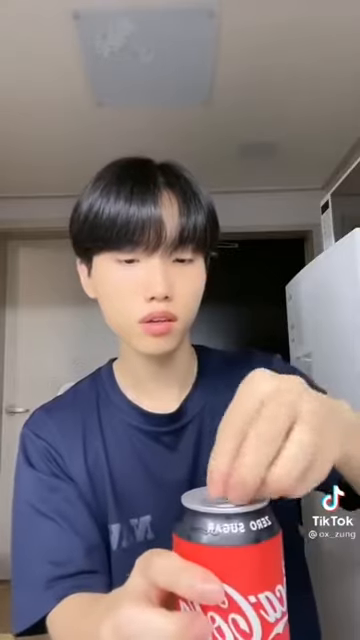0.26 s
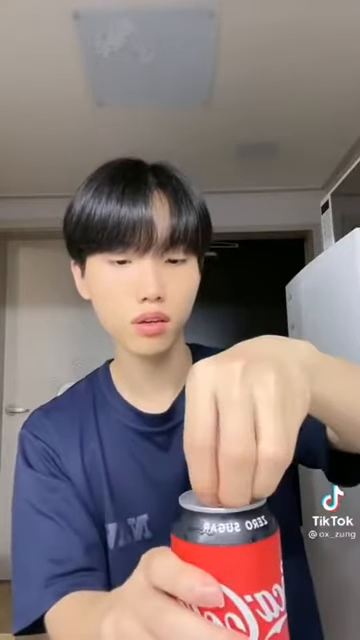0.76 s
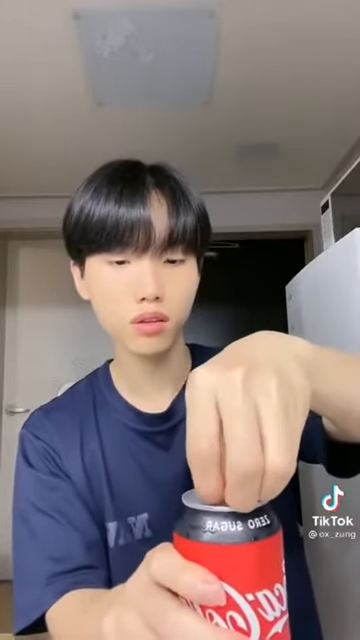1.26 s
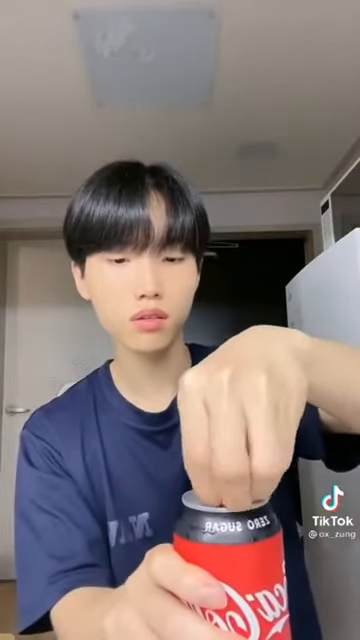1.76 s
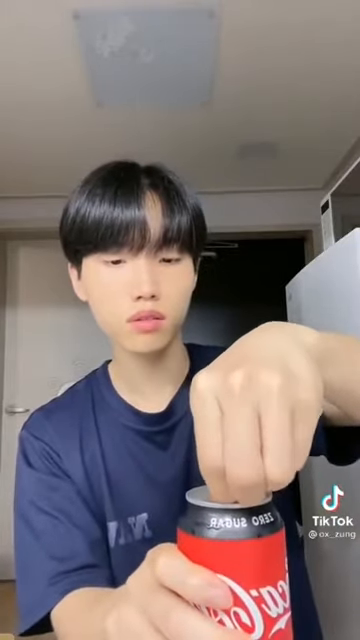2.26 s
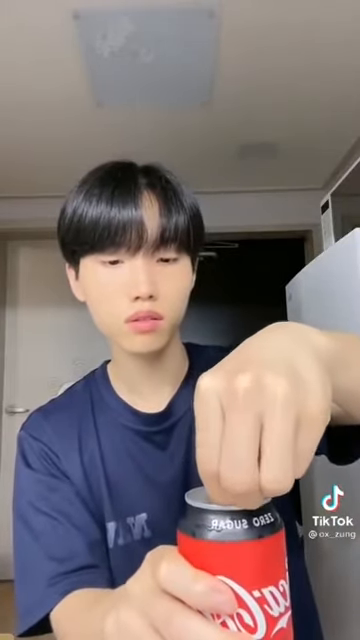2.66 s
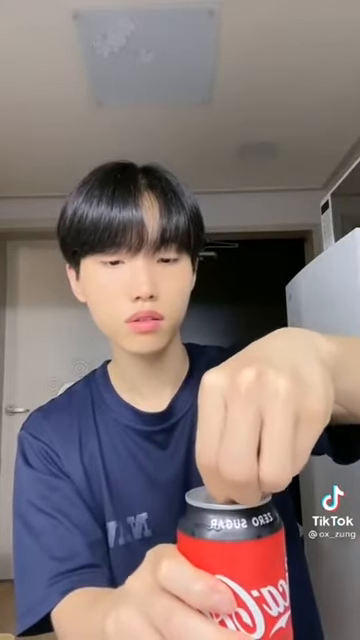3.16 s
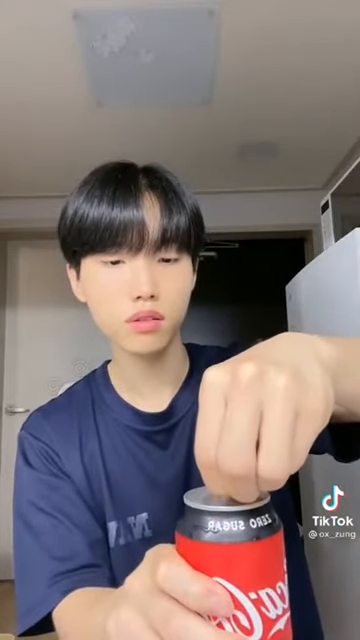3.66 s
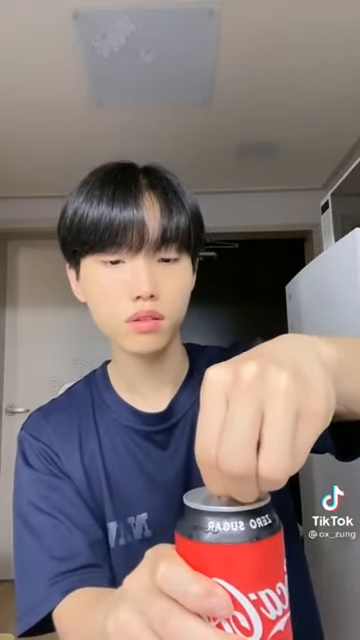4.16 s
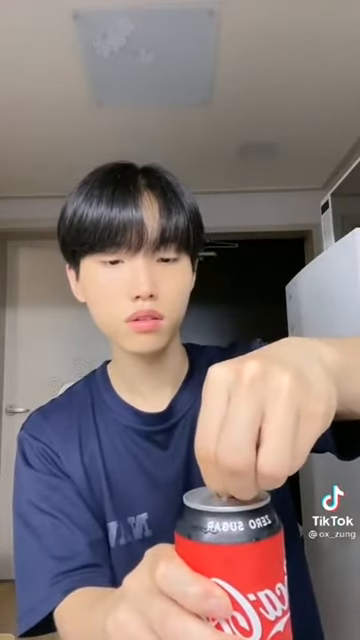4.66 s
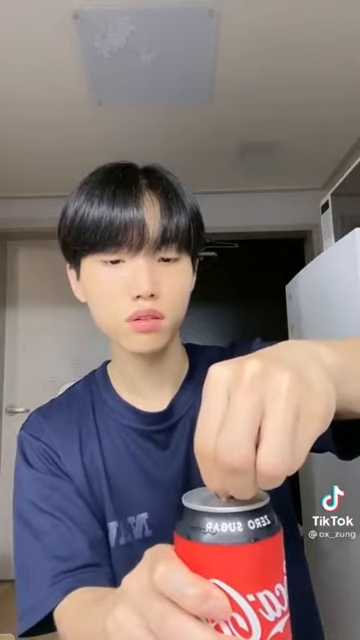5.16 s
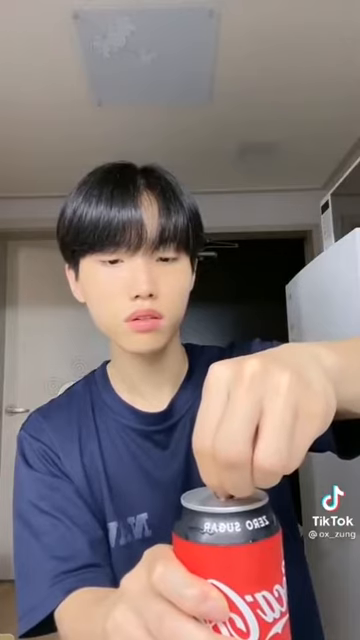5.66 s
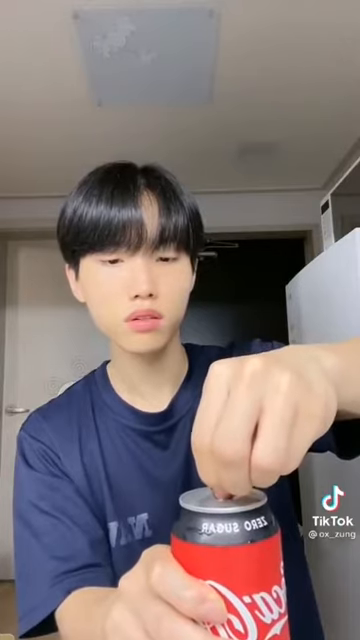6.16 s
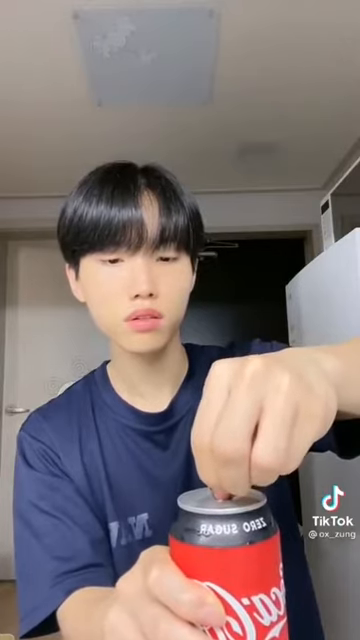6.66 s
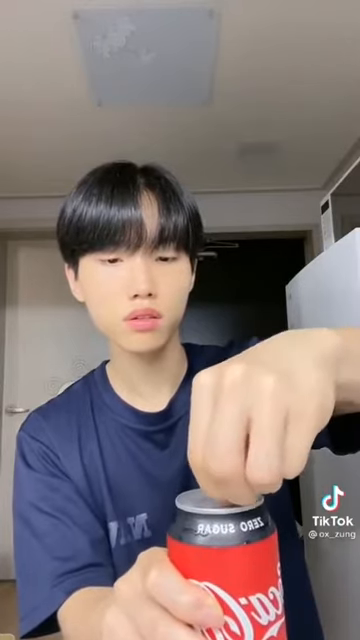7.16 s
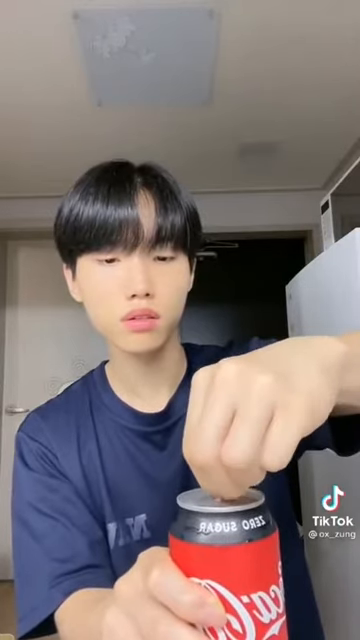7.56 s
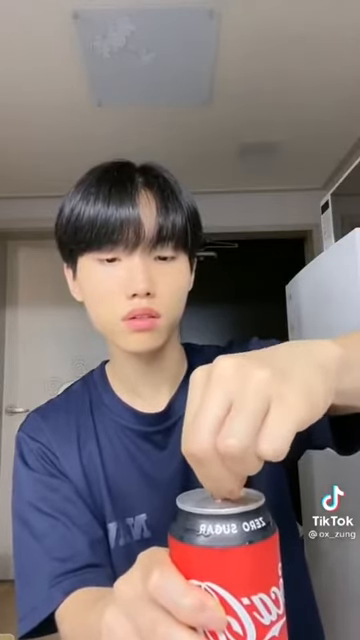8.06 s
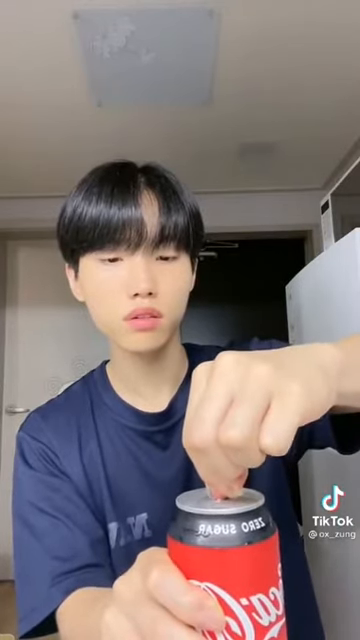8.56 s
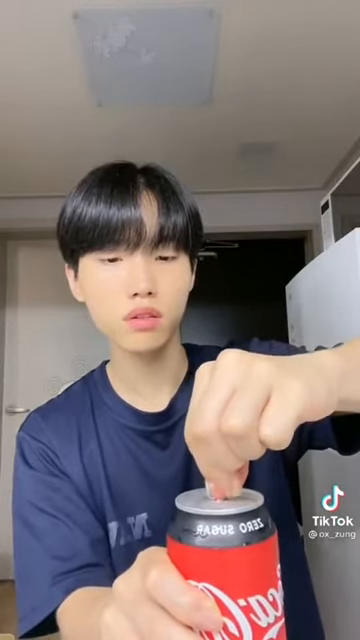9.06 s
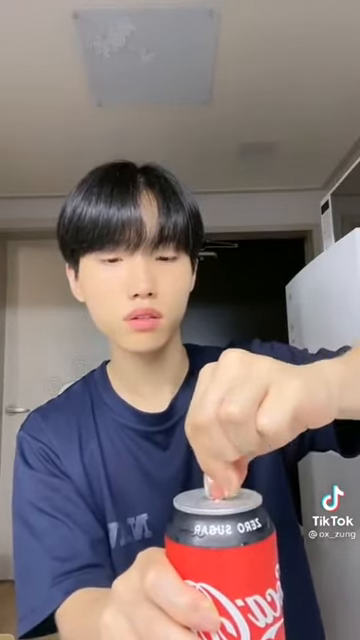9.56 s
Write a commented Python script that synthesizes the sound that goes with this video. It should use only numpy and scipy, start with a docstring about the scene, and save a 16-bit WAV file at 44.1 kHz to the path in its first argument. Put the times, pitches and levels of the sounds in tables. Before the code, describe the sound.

An aluminium drink can is handled on a table, very near the microphone. Quick bright clicks and light rubbing open the scene, then soft presses, a tiny squeak and irregular low thuds take over, strongest around seven seconds. Late on, the tab snaps loudly, and snaps twice again with a short scrape at the end. The can stays closed; a low appliance rumble fades behind quiet room air.

```python
"""Ticks, scrapes and sharp snaps: a fingernail picks at the tab of a full aluminium drink can.
It is heard close to the microphone in a small room; noise grains and short blows excite the lid.
The can rocks and knocks on the table, whose ringing modes boom into the microphone through its stand.
Soft presses, a brief squeak and a ringing tab are gliding, wavering and decaying tones.
Behind them lie room air and an appliance's faint, fading rumble, made of noise and an uneven tone."""
import sys
import numpy as np
from scipy import signal
from scipy.fft import rfft, irfft
from scipy.io import wavfile
from scipy.ndimage import uniform_filter1d

SR = 44100
rng = np.random.default_rng(int(sys.argv[2]) if len(sys.argv) > 2 else 0)


def waveform_to_disk(signal):
    """Save audio, clipped to [-1, 1], as 16-bit WAV at the path in sys.argv[1]."""
    frames = np.transpose(np.atleast_2d(signal))
    scaled = np.clip(frames, -1, 1) * 32767
    samples = np.round(scaled).astype(np.int16)
    wavfile.write(sys.argv[1], SR, samples)


N = 432610  # samples
TAPS = 8192  # length of the colouring filters, samples
HZ = np.fft.rfftfreq(TAPS, 1 / SR)


def amp(db):
    """Decibels to gain."""
    return 10 ** (np.asarray(db) / 20)


def unit(x):
    """Scales to rms 1."""
    return x / np.sqrt(np.mean(x ** 2) + 1e-20)


def blow(x, size=256):
    """Scales a hit to the energy of size samples at rms 1."""
    return x * np.sqrt(size / (np.sum(x ** 2) + 1e-20))


def read(points, hz):
    """Reads a curve on a log-frequency axis."""
    f, value = np.transpose(points)
    return np.interp(np.log(hz + 1), np.log(f + 1), value)


def add(mix, s, sound):
    """Mixes a sound in at time s."""
    part = mix[max(round(s * SR), 0):][:len(sound)]
    part += sound[:len(part)]


def colour(x, db):
    """Causal minimum-phase filter with the gain db over HZ."""
    log_gain = np.log(amp(np.r_[db, db[-2:0:-1]]))
    response = np.fft.ifft(np.exp(np.conj(signal.hilbert(log_gain)))).real
    return signal.fftconvolve(x, response)


def soften(corner_hz, order=3):
    """Treble loss of a soft contact, as a dB curve over HZ."""
    return -10 * np.log10(1 + (HZ / corner_hz) ** order)


def peak(hz, width, db):
    """One resonance as a dB curve over HZ."""
    return 10 * np.log10(1 + (amp(db) ** 2 - 1) / (1 + (2 * (HZ - hz) / width) ** 2))


def tail(t60, size=22000):
    """Dense random echoes of energy 1, each band dying at its own speed."""
    hz, t, bands = signal.stft(rng.standard_normal(size), SR, nperseg=256)
    decay = amp(-60 * t / read(t60, hz)[:, None])
    out = signal.istft(bands * decay, SR, nperseg=256)[1][:size]
    return out / np.linalg.norm(out)


# spectrum of the room's still air, before scaling to AIR_DB: pitch_hz [Hz], density_db [dB per Hz]
AIR_SPECTRUM = [(25, -14), (55, 4), (120, 1.5), (220, -8.5), (500, -10.5), (690, -7), (850, -16.5),
                (1200, -20.5), (2500, -25.5), (5000, -32.5), (8000, -37), (10500, -36.5), (13000, -39.5),
                (15300, -37)]
AIR_DB = -51
# faint narrow whines, before a common trim: pitch_hz [Hz], level_db [dB]
WHINE_LINES = [(4037, -78), (5480, -84.5), (8942, -88.5), (9227, -94.5)]
# the appliance slowly dies away, and steps down once
HUM_DB, HUM_FADE_DB_PER_S = -47.5, 1.5
HUM_DROP_S, HUM_DROP_DB = 4.5, 3.5


def background(hum_hz=72, hum_width=16, flutter_db=-5, hollow_hz=680, hollow_width=70, hollow_db=-67,
               whine_width=20, whine_trim_db=-1.0):
    """Room air with a steady hollow note and faint whines; an appliance hums unevenly and fades."""
    hz, t = np.fft.rfftfreq(N, 1 / SR), np.arange(N) / SR

    def noise(gain):
        return unit(irfft(rfft(rng.standard_normal(N)) * gain, N))

    def line(centre, width):
        return noise(1 / (1 + ((hz - centre) / width) ** 2))

    phase_wander = 1.5 * line(0, 3)
    tone = unit(np.sin(2 * np.pi * hum_hz * t + phase_wander))
    tone += amp(flutter_db) * line(hum_hz, hum_width)
    drop = HUM_DROP_DB * np.clip((t - HUM_DROP_S) / .2, 0, 1)
    hum = amp(HUM_DB - HUM_FADE_DB_PER_S * t - drop) * tone
    hollow_note = amp(hollow_db) * line(hollow_hz, hollow_width)
    whines = sum(amp(db + whine_trim_db) * line(f, whine_width) for f, db in WHINE_LINES)
    air = amp(AIR_DB) * noise(amp(read(AIR_SPECTRUM, hz)))
    return air + hum + hollow_note + whines


# decay of the walls' echoes: pitch_hz [Hz], t60_s [s]
ROOM_DECAY = [(500, 0.33), (2500, 0.38), (6000, 0.26), (10000, 0.29), (15000, 0.19)]


def room(x, wet_db=-6, early_db=-9, early_t60=.06):
    """Near surfaces answer at once; the walls follow with a longer tail."""
    echoes = amp(wet_db) * tail(ROOM_DECAY) + amp(early_db) * tail([(1000, early_t60)])
    echoes *= 1 - np.exp(-np.arange(len(echoes)) / SR / 0.00097)  # builds up over about a millisecond
    return x + signal.fftconvolve(x, echoes)[:N]


# low modes of the table: pitch_hz [Hz], relative level_db [dB], t60_s [s]
TABLE_LOW_MODES = [(51, -7.5, .25), (107.3, -3.5, 0.14), (154.6, -7, 0.15), (180.1, -5.5, 0.3),
                   (200.5, -5, 0.29), (279.4, -13, .14), (322.1, -8, 0.19), (364.1, -4.5, 0.23),
                   (404.9, -8, 0.37), (473, -13, .14), (498.3, -4, 0.11), (531, -1.5, 0.058),
                   (580, -22, .1), (628, -12, 0.16), (687, -17.5, .11), (723, -11, .11), (880, -19, 0.2),
                   (905, -19.5, .1), (1075, -20.5, 0.21), (1145, -25.5, 0.15)]
# spectrum of its dense upper modes: pitch_hz [Hz], relative level_db [dB]
TABLE_SPECTRUM = [(100, -16), (400, 3), (700, -1), (850, -14.5), (1120, -3), (1220, -10), (1550, -3.5),
                  (2080, -18), (2270, -8.5), (3050, -9.5), (3350, -3), (3520, -23), (8000, -34.5)]
# decay of the dense modes: pitch_hz [Hz], t60_s [s]
TABLE_DECAY = [(100, 0.75), (400, 0.45), (1000, 0.13), (3000, 0.075)]


def table(travel=.002, front_db=-4):
    """The table's answer to one blow; bending waves bring the treble first and the bass last."""
    dense = tail(TABLE_DECAY)
    dense[0] += amp(front_db)
    t = np.arange(len(dense)) / SR
    ring = np.zeros(len(t))
    for k, (hz, db, t60) in enumerate(TABLE_LOW_MODES):
        age = np.maximum(t - travel * np.sqrt(400 / hz), 0)  # travel is in seconds at 400 Hz
        # halfway across the board, neighbouring pairs of modes swing against each other
        sign = (-1) ** (k // 2)
        decay = np.exp(-np.log(1000) * age / t60)
        ring += sign * amp(db) * decay * np.sin(2 * np.pi * hz * age)
    upper = colour(dense, read(TABLE_SPECTRUM, HZ))[:len(t)]
    return blow(ring) + .5 * blow(upper)


# the table's murmur under the hands, before a common trim: time_s [s], level_db [dB]
MURMUR_LEVEL = [(0.0, -38), (0.22, -46), (2.29, -62), (3.22, -53.5), (3.87, -51), (4.23, -52),
                (6.58, -49.5), (6.99, -55.5), (7.75, -54), (8.73, -53.5), (9.01, -61), (9.8, -44)]


def handling(board, per_s=70, corner_hz=750, hollow_hz=680, hollow_width=110, hollow_db=9, trim_db=-4.0):
    """Many tiny soft nudges of the can keep the table murmuring, with a hollow note."""
    nudges = rng.standard_normal(N) * (rng.random(N) < per_s / SR)
    softness = soften(corner_hz, order=4) + peak(hollow_hz, hollow_width, hollow_db)
    murmur = signal.fftconvolve(nudges, colour(board, softness))[:N]
    level_db = trim_db + np.interp(np.arange(N) / SR, *np.transpose(MURMUR_LEVEL))
    return amp(level_db) * unit(murmur)


# soft presses flex the can: start_s [s], length_s [s], level_db before a common trim [dB],
# pitch_hz in mid-glide [Hz]
CAN_PRESSES = [(.008, 0.055, -45, 504), (0.434, 0.041, -50, 523), (1.267, 0.028, -43.5, 360),
               (1.95, 0.025, -45, 365), (5.94, 0.063, -44, 340), (6.989, 0.026, -42, 347),
               (8.21, .05, -42.5, 385)]


def presses(glide=0.31, rustle_db=-7, trim_db=-1):
    """The wall gives under the fingers with a dull, hollow bump that rises as it tightens."""
    out = np.zeros(N)
    for s, length, db, hz in CAN_PRESSES:
        u = np.linspace(0, 1, int(length * SR))
        pitch = hz * (1 + glide * (u - .5))
        note = unit(np.sin(2 * np.pi * np.cumsum(pitch) / SR))
        band = signal.butter(2, [hz / 2, hz * 2], "band", fs=SR, output="sos")
        rustle = unit(signal.sosfilt(band, rng.standard_normal(len(u))))
        swell = np.sin(np.pi * u ** 0.48) ** 2
        add(out, s, amp(db + trim_db) * unit((note + amp(rustle_db) * rustle) * swell))
    return out


# the can rocks and knocks on the table, before a common trim: start_s [s], level_db [dB]
TABLE_KNOCKS = [(.078, -34.5), (.758, -39), (.899, -43.5), (1.2665, -45), (1.6869, -27.5), (1.7788, -33.5),
                (3.349, -25), (3.5224, -38), (3.639, -33), (3.7275, -32.5), (3.8165, -37), (3.9038, -39.5),
                (3.9934, -32), (4.4245, -29.5), (4.611, -35.5), (4.7492, -40.5), (5.3216, -31.5),
                (5.5189, -34.5), (5.75, -37.5), (6.2251, -33), (6.2971, -37.5), (6.9523, -33.5),
                (7.243, -21), (7.3019, -25.5), (7.797, -33), (8.1119, -39), (8.2761, -30.5), (8.397, -31),
                (8.602, -25), (8.678, -29), (8.791, -39.5), (8.8438, -33), (9.2953, -34), (9.7567, -36.5)]
# a harder knock has a shorter contact, so its treble reaches higher
CONTACT_HZ, CONTACT_AT_DB, DB_PER_OCTAVE = 1080, -34.5, 7.5
# the bare edge of the base clacks down with a far harder contact, before the same trim:
# start_s [s], level_db [dB]
BASE_CLACKS = [(5.2878, -35.5), (5.3598, -40), (6.996, -45)]
CLACK_HZ, CLACK_THIN_HZ = 5000, 500  # so small a contact also moves little bass
# the tab and the nail click on the lid: start_s [s], level_db [dB], chatter decay_s [s],
# ring_hz [Hz], ring_db [dB], gain edge_db near 15 kHz [dB]
LID_CLICKS = [(.0453, -24.5, 0.015, 2420, 17.5, 9), (.0516, -31.5, 0.011, 3070, 21, 6),
              (.348, -37.5, 0.0046, 8900, 19, 12), (.4075, -39, 0.0037, 8600, 8, 6),
              (0.505, -46, .007, 7500, 6, 2), (.548, -37, 0.015, 4400, 5, 6),
              (.652, -41, 0.014, 3030, 8, 1), (1.6566, -59.5, .004, 8350, 5, 2),
              (2.4868, -50, 0.012, 1520, 20, 15), (2.5263, -46.5, 0.0096, 1500, 7, 8),
              (2.579, -53.5, 0.0068, 6000, 2, 4), (6.995, -57, .002, 7160, 20, 0),
              (7.2022, -52, 0.0018, 2200, 11, -2), (7.2433, -38, .008, 6030, 4.5, 4),
              (8.1782, -14.5, 0.0034, 6000, 14.5, 4), (8.1805, -31.5, .003, 2050, 21.5, 0.5),
              (8.2777, -44.5, .001, 1740, 34, -2), (8.896, -43.5, 0.004, 5230, 21, -8),
              (9.479, -37, 0.0034, 5500, 9.5, 4.5), (9.5404, -48, 0.0063, 5530, 12, 0),
              (9.7412, -16.5, 0.0034, 5100, 9.5, 12), (9.7706, -17.5, 0.0043, 6900, 16, 23)]
# a click shoves the can softly: level for a 0 dB click before the same trim, dB per dB, corner in Hz
RECOIL_DB, RECOIL_SLOPE, RECOIL_HZ = -23, .55, 450


def knocks(board, trim_db=2, ripple_db=2):
    """Every knock, clack and recoil rings the same table; a softer contact leaves out the treble."""
    out = np.zeros(N)
    blows = []
    for s, db in TABLE_KNOCKS:
        corner_hz = CONTACT_HZ * 2 ** ((db - CONTACT_AT_DB) / DB_PER_OCTAVE)
        blows.append((s, db, soften(corner_hz)))
    for s, db in BASE_CLACKS:
        bass_loss = -10 * np.log10(1 + CLACK_THIN_HZ / (HZ + 1))
        blows.append((s, db, soften(CLACK_HZ) + bass_loss))
    for s, db, *_ in LID_CLICKS:
        blows.append((s, RECOIL_DB + RECOIL_SLOPE * db, soften(RECOIL_HZ)))
    for s, db, contact in blows:
        # a small random ripple varies the tone of each blow
        ripple_phase = np.sqrt(HZ) * rng.uniform(0.509, 1) + 2 * np.pi * rng.random()
        ripple = ripple_db * np.sin(ripple_phase)
        add(out, s, amp(db + trim_db) * blow(colour(board, contact + ripple)))
    return out


# spectrum of a click on the lid: pitch_hz [Hz], gain_db [dB]
LID_SPECTRUM = [(100, -23), (700, -21), (1100, -11.5), (2000, -4.5), (3300, -3.5), (4700, -7), (6000, -1),
                (8000, -3.5), (8900, -7), (10500, -7.5), (12400, -20), (15200, -10.5), (15700, -28)]
# resonances of the lid, undamped: pitch_hz [Hz], width_hz [Hz], gain_db [dB]
LID_RESONANCES = [(1410, 52, 8.5), (2238, 82, 8.5), (2850, 130, 0), (3720, 170, 6), (4550, 150, 11),
                  (5200, 200, 1), (5830, 110, 8.5), (7900, 220, 8.5), (9490, 260, 8), (11350, 300, 6)]
# how far the resonances stand out under a resting finger, and when the tab snaps free
HELD_SHARE, FREE_SHARE = 0.66, .7
HELD_DB, FREE_DB = -57, -15.5  # the click levels that go with those two


def lid(hz, width, db, share, edge_db=0):
    """Colour of the lid, with one further resonance set by where and how the tab is held."""
    modes = share * sum(peak(*mode) for mode in LID_RESONANCES)  # a resting finger damps them
    edge = edge_db * np.exp(-((HZ - 15000) / 2300) ** 2)
    return read(LID_SPECTRUM, HZ) + modes + peak(hz, width, db) + edge


# the fingertip rubs the lid: start_s [s], length_s [s], level_db [dB], squeak_hz [Hz], squeak_db [dB]
LID_RUBS = [(0, 0.045, -50, 2870, 13), (0.039, 0.029, -51, 1456, 32), (0.038, 0.3, -63.5, 14900, 19),
            (0.048, 0.21, -57.5, 2700, 16), (0.378, 0.031, -53, 8000, 2), (.812, .05, -69, 9600, 12),
            (1.89, 0.074, -66.5, 14600, 15), (1.929, 0.029, -57, 1450, 22), (2.482, .045, -55.5, 1490, 28),
            (2.663, 0.098, -67, 14500, 24), (4.005, .062, -63.5, 2100, 17), (5.96, .025, -71, 7600, 12),
            (9.745, 0.064, -32.5, 4920, 13)]
SQUEAK_SPAN_HZ = 3200  # width times gain of a rub's resonance: the stronger it is, the narrower


def rubs(grain=0.97):
    """Skin sticks and slips in tiny uneven grains that excite the lid."""
    out = np.zeros(N)
    for s, length, db, hz, squeak_db in LID_RUBS:
        n = int(length * SR)
        slips = rng.standard_normal(n) * rng.exponential(1, n) ** grain * np.hanning(n)
        tone = lid(hz, SQUEAK_SPAN_HZ / amp(squeak_db), squeak_db, HELD_SHARE)
        add(out, s, amp(db) * blow(colour(slips, tone), size=n))
    return out


# the skin slips evenly for a moment: start_s [s], length_s [s], level_db [dB], mean pitch_hz [Hz]
EVEN_SLIP = (2.5, .1, -70, 2790)


def squeak(odd_db=-7, waver=0.007):
    """Regular stick and slip: a thin wavering tone whose octave outweighs its fundamental."""
    s, length, db, hz = EVEN_SLIP
    n, out = int(length * SR), np.zeros(N)
    drift = unit(uniform_filter1d(rng.standard_normal(n), size=300))
    phase = 2 * np.pi * np.cumsum(hz * (1 + waver * drift)) / SR
    tone = amp(odd_db) * np.sin(phase) + np.sin(2 * phase)
    add(out, s, amp(db) * unit(np.hanning(n) * tone))
    return out


TWANG_S, TWANG_DB, TWANG_HZ, TWANG_T60 = .348, -35.5, 3650, 0.084  # start s, dB, Hz, s


def twang(rattle=0.58):
    """The flicked tab rings briefly by itself, rattling on its rivet."""
    t, out = np.arange(int(2 * TWANG_T60 * SR)) / SR, np.zeros(N)
    shake = 1 + rattle * unit(uniform_filter1d(rng.standard_normal(len(t)), size=100))
    ring = np.exp(-np.log(1000) * t / TWANG_T60) * np.sin(2 * np.pi * TWANG_HZ * t)
    add(out, TWANG_S, amp(TWANG_DB) * blow(shake * ring))
    return out


# LID_CLICKS, listed above knocks(), is played here
RING_Q = 4.7  # sharpness of the ring that the grip on the tab sets
# chatter against the first blow at this decay; its energy grows with its length
CHATTER_DB, CHATTER_AT_S = 2, .005


def clicks(grain=0.18):
    """A sharp blow, then the tab chatters briefly; the harder the click, the freer the lid rings."""
    out = np.zeros(N)
    t = np.arange(3000) / SR
    for s, db, decay, hz, ring_db, edge_db in LID_CLICKS:
        grains = rng.standard_normal(len(t)) * rng.exponential(1, len(t)) ** grain
        chatter = blow(grains * np.exp(-t / decay), size=1)
        drive = amp(CHATTER_DB) * np.sqrt(decay / CHATTER_AT_S) * chatter
        drive[0] += 1  # the first blow
        share = np.interp(db, [HELD_DB, FREE_DB], [HELD_SHARE, FREE_SHARE])
        tone = lid(hz, hz / RING_Q, ring_db, share, edge_db)
        add(out, s, amp(db) * blow(colour(drive, tone)))
    return out


def scene():
    """The lid reaches the microphone through the air, the table mostly through the stand."""
    board = table()
    bright = room(clicks() + twang() + rubs() + squeak())
    dull = room(knocks(board) + presses() + handling(board), wet_db=-9.5, early_db=-14.5)
    return (bright + dull + background())[None]


EDGE_HZ = 15700  # top of the band


def record(dry):
    """Clips at full scale, then removes the treble above the band edge."""
    low_pass = signal.firwin(511, EDGE_HZ, window=("kaiser", 9), fs=SR)
    return signal.oaconvolve(np.clip(dry, -1, 1), low_pass[None], "same")


dry = scene()
out = record(dry)
waveform_to_disk(out)
```